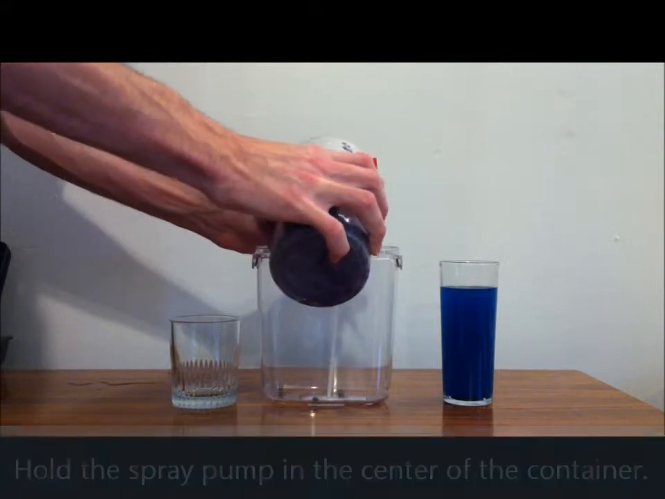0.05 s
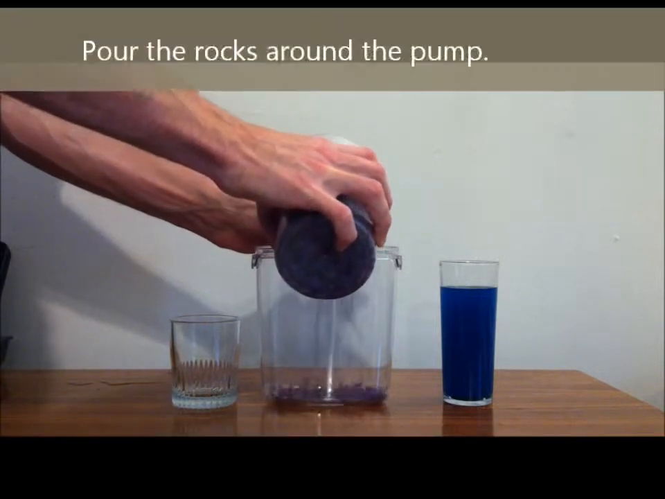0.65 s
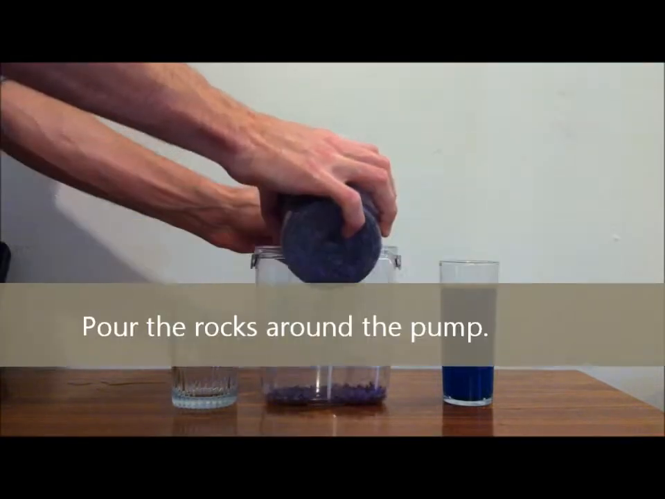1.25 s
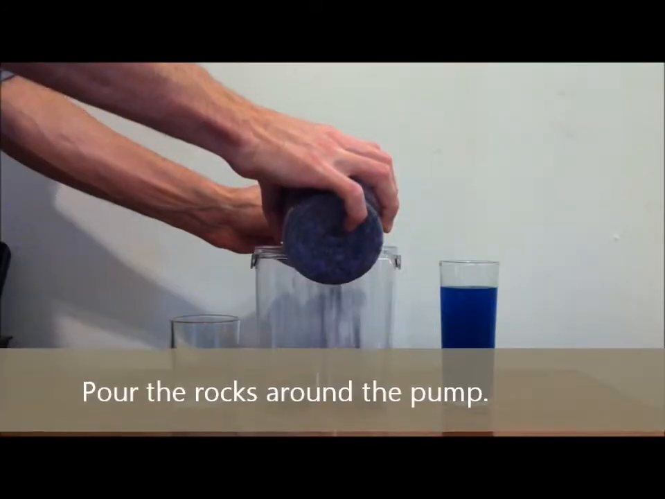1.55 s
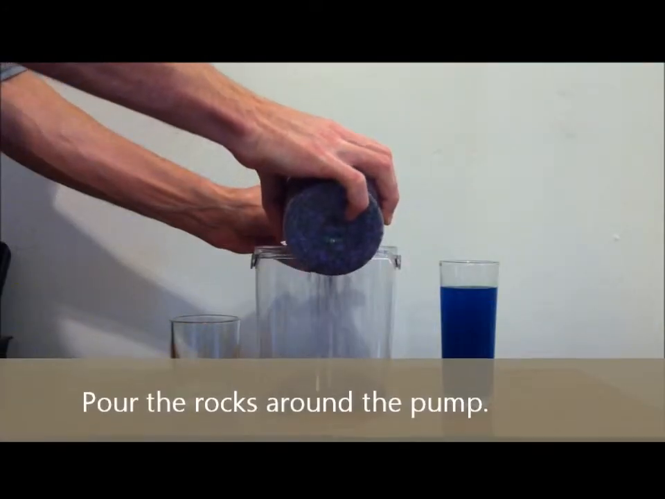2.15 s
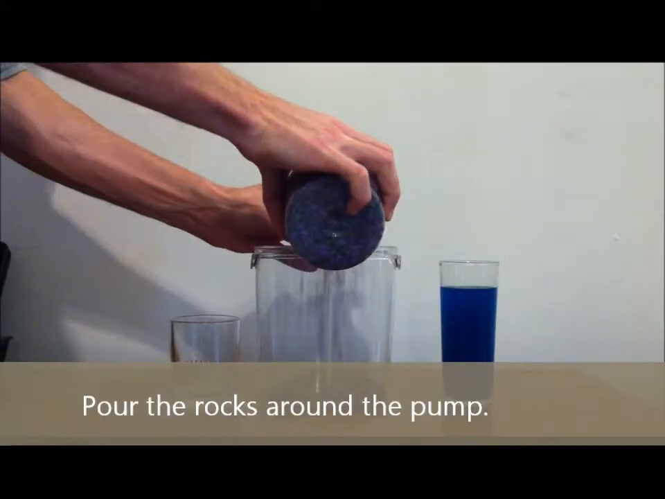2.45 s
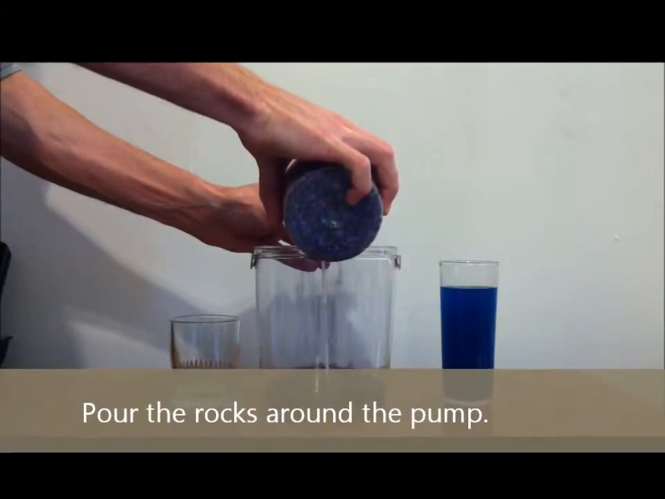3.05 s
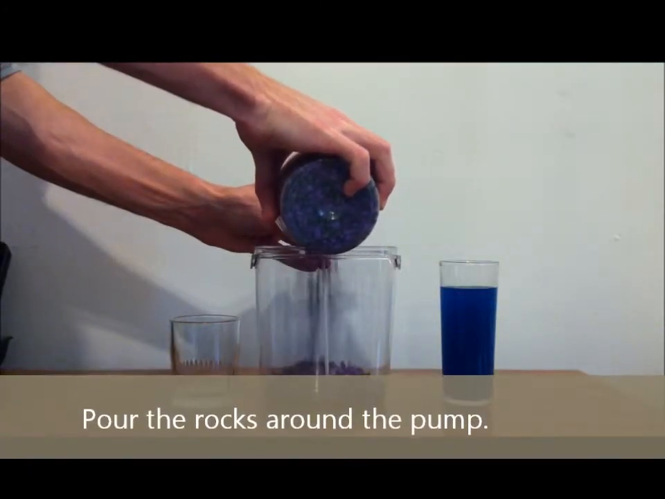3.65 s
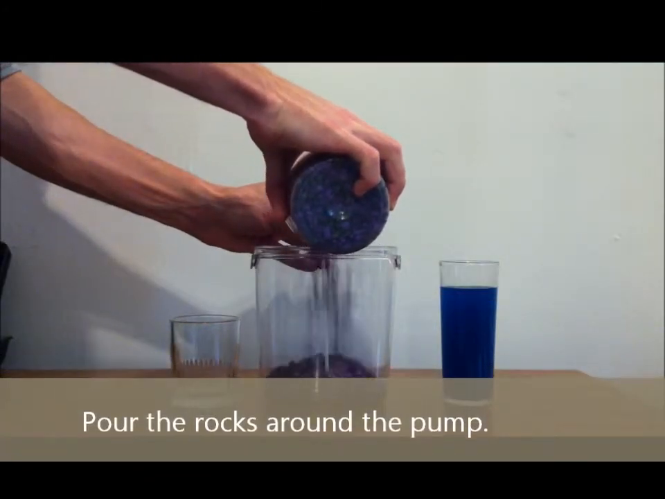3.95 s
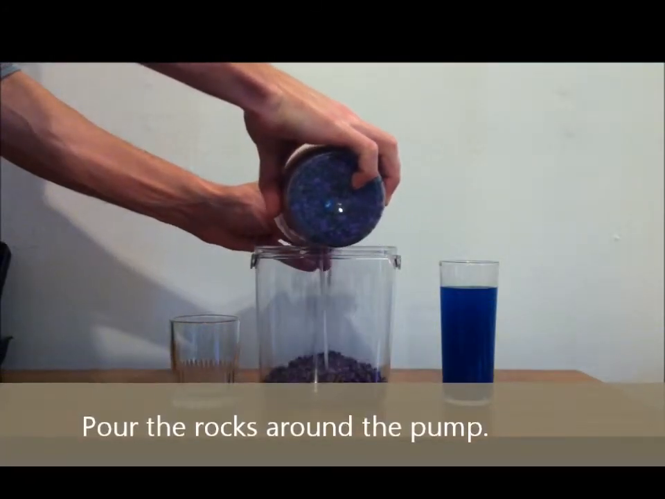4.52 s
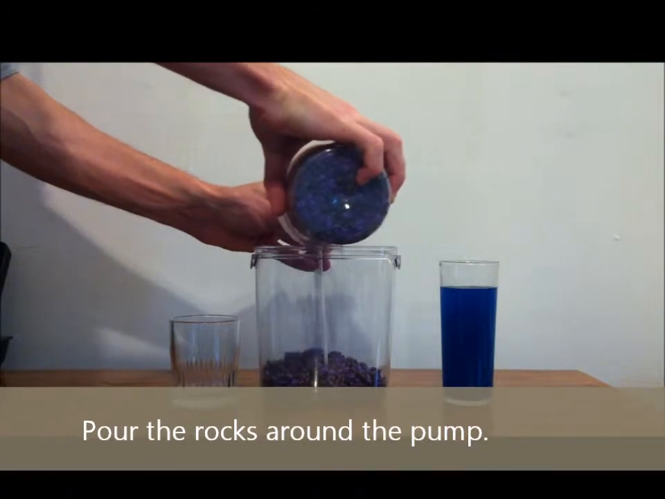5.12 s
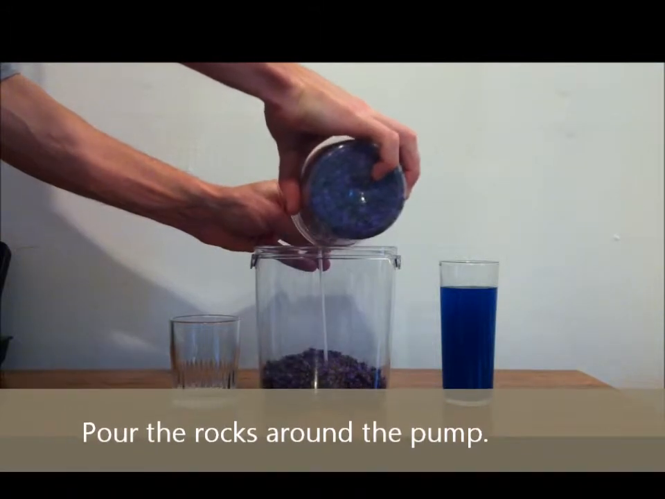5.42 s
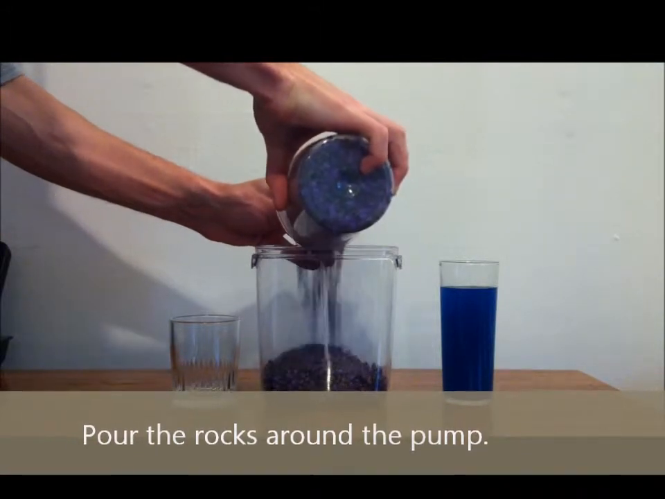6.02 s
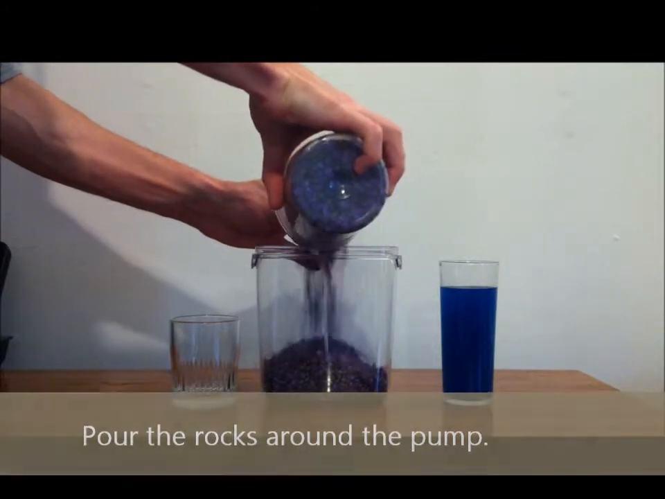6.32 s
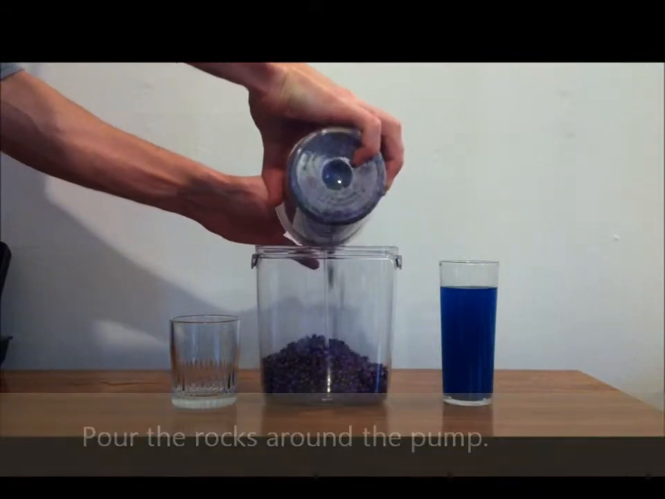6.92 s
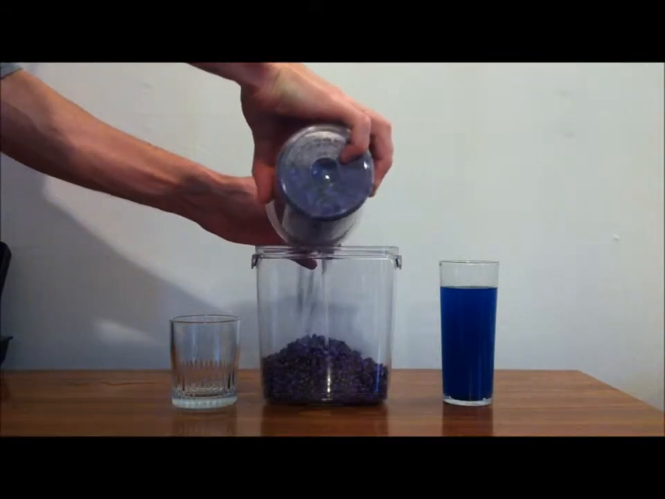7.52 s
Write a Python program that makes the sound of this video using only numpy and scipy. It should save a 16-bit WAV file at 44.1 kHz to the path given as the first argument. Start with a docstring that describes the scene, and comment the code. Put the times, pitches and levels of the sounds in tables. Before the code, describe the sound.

Small gravel pours from a tub into a tall plastic container in a small, bare room. A few stones click down sharply at the start. From about 0.4 seconds a loud, dense rattle bounces on the bare plastic bottom and makes it ring. Between 1 and 2.3 seconds the growing heap muffles this into quieter stone-on-stone pattering, over faint hollow tones and the rustle of gravel sliding in the tub. Stray stones ping off the walls. The stream swells around 3.8 seconds, then runs unevenly, thinning after 5.2 and almost stopping at 5.6, leaving a faint rustle. It resumes from about 6 to 6.6 seconds with a few light, hollow knocks. After that, the last stones trickle down in small clicking clumps, with occasional soft knocks, until about 7.8 seconds.

```python
"""A stream of small gravel pours from a tub into a tall plastic container on a table in a small, bare room.
Each stone clicks as it lands. The first ones bounce and ring the bare plastic base; the growing heap
muffles it and lowers its pitch, leaving stone-on-stone clicks over the hollow notes of tub and container.
Gravel rustles in the tub, and stray stones ping and knock on the walls. The stream falters as it jams
at the lip, and the last stones drop in small clumps."""
import sys
import numpy as np
from scipy import signal
from scipy.io import wavfile
from scipy.ndimage import uniform_filter1d

SR = 44100
rng = np.random.default_rng(int(sys.argv[2]) if len(sys.argv) > 2 else 0)


def dump(signal):
    """Clip the signal to [-1, 1] and save it as 16-bit WAV at the path in sys.argv[1]."""
    limited = np.clip(np.atleast_2d(signal).T, -1, 1)
    pcm = np.round(limited * 32767).astype(np.int16)
    wavfile.write(sys.argv[1], SR, pcm)


N = 343098
TIME = np.arange(N) / SR

# The pour as the tub is tipped and righted. Each row: time in seconds, stone-on-stone level in dB.
POUR_LEVEL = [(0, -52), (0.38, -49.5), (0.41, -40.5), (0.87, -39), (1.0, -42), (1.3, -42.5), (1.85, -39.5),
              (2.12, -39), (2.23, -44), (3.5, -41.5), (3.8, -36), (4.12, -37.5), (4.24, -44), (4.64, -48),
              (4.8, -43), (5.2, -44.5), (5.3, -51.5), (5.58, -53), (5.61, -73.5), (5.76, -72.5),
              (5.89, -59.5), (6.03, -44.5), (6.52, -40.5), (6.64, -52.5), (7.15, -57), (7.78, -55.5)]
# The plastic base before the heap loads it. Each row: mode frequency in Hz, width in Hz, level in dB.
BASE_MODES = [(1160, 65, -2), (1277, 18, 7), (1322, 35, 5), (1373, 33, 9), (1423, 61, 4.5), (1757, 23, 6.5),
              (2210, 90, 0), (2413, 35, 5.5), (2540, 27, 4.5), (2950, 28, -2), (3190, 40, 2.5),
              (3337, 22, 10), (3850, 37, 2.5), (5280, 130, 3)]
# The container's walls. Each row: mode frequency in Hz, width in Hz, level in dB.
WALL_MODES = [(464, 24, -2), (568, 22, 5.5), (637, 31.3, -0.5), (694, 15, -4), (737, 24, -3), (949, 42, -6),
              (1042, 61, -7.5)]

USUAL_POUR_DB = -40
LOADING_S = (1.6, 3.8)  # over this span the heap flattens the base's pitch and damps the wall pings


def gain_of(db):
    """Decibels to amplitude."""
    return 10 ** (np.asarray(db) / 20)


def unit_energy(x):
    """Scales a response to an energy of one."""
    return x / np.linalg.norm(x)


def at_frequency(rows, hz):
    """Reads a spectrum table on a log-frequency axis."""
    row_hz, values = np.transpose(rows)
    return np.interp(np.log(hz + 1), np.log(row_hz + 1), values)


def at_time(rows, s):
    """Reads a time table at s seconds."""
    return np.interp(s, *np.transpose(rows))


def add(mix, s, sound):
    """Mixes a sound in at s seconds."""
    part = mix[max(round(s * SR), 0):][:len(sound)]
    part += sound[:len(part)]


def through(x, response):
    """Plays x through an impulse response."""
    return signal.oaconvolve(x, response)[:len(x)]


def smoothed(x, over_s, passes=1):
    """A moving average, applied once or more."""
    for _ in range(passes):
        x = uniform_filter1d(x, int(over_s * SR) + 1)
    return x


def steadied(x, over_s, passes=2, floor=1e-9):
    """Holds the mean power near one, leaving quicker flicker as it is."""
    return x / np.sqrt(abs(smoothed(x ** 2, over_s, passes)) + floor)


def sharpest_response(spectrum, size=1024):
    """The minimum-phase impulse response with the given colour."""
    hz = abs(np.fft.fftfreq(size, 1 / SR))
    log_gain = np.log(gain_of(at_frequency(spectrum, hz)))
    response = np.fft.ifft(np.exp(np.conj(signal.hilbert(log_gain)))).real
    return unit_energy(response[:size // 2])


def ringing(modes, size=4096):
    """A struck body's decaying modes; the sign of each depends on where the blow lands."""
    t = np.arange(size) / SR
    ring = np.zeros(size)
    for hz, width_hz, db in modes:
        envelope = gain_of(db) * width_hz * np.exp(-np.pi * width_hz * t)
        ring += rng.choice([-1, 1]) * envelope * np.cos(2 * np.pi * hz * t)
    return unit_energy(ring)


def sustained_ring(blows, modes, rooms, steady_s, places=4):
    """A body kept ringing at an even level by blows that land in a few places."""
    place = rng.integers(0, places, N)
    rings = (through(blows * (place == k), signal.fftconvolve(ringing(modes), space))
             for k, space in enumerate(rooms[:places]))
    return steadied(sum(rings), steady_s)


def hush(level_db=-82):
    """The microphone's own faint, steady noise."""
    # A dark noise colour. Each row: frequency in Hz, relative density in dB.
    colour = [(25, 11), (65, -4), (140, 5.5), (500, -3), (1200, -3), (5000, -21), (16000, -42)]
    return gain_of(level_db) * through(rng.standard_normal(N), sharpest_response(colour, size=4096))


def room(tail_db=2.0, build_s=0.0023, wander_s=.0004, size=17640):
    """Direct sound, a few hard reflections, then a dense tail whose bands die at their own speeds."""
    # The room's decay. Each row: frequency in Hz, seconds to fall by 60 dB.
    decay_times = [(150, 0.38), (600, 0.14), (2000, 0.3), (6000, 0.44), (12000, 0.27), (16000, 0.21)]
    # Early reflections from table and walls. Each row: delay in seconds, level in dB.
    reflections = [(.0013, -11.5), (.0064, -7), (.0075, -19), (0.0115, -8), (0.013, -11), (0.0144, -9.5)]
    hz, t, bands = signal.stft(rng.standard_normal(size), SR, nperseg=256)
    decay = gain_of(-60 * t / at_frequency(decay_times, hz)[:, None])
    tail = signal.istft(bands * decay, SR, nperseg=256)[1][:size]
    fade_in = 1 - np.exp(-(np.arange(size) / SR / build_s) ** 2)
    response = gain_of(tail_db) * unit_energy(tail * fade_in)
    response[0] += 1
    for delay_s, db in reflections:
        shift_s = wander_s * (2 * rng.random() - 1)  # paths shift with the landing place
        add(response, delay_s + shift_s, [gain_of(db)])
    return response


def lumps_db(swing_db, lump_s):
    """Gravel leaves the tub in lumps: a slow random swing in level."""
    lumps = smoothed(rng.standard_normal(N), lump_s, passes=2)
    return swing_db * lumps / lumps.std()


def jams_db(depth_db=-12):
    """The level dips as gravel jams at the lip of the tub, and snaps back as it gives way."""
    # Each row: moment of release in seconds, choking time in seconds.
    jams = [(.07, 0.047), (.192, 0.014), (1.145, 0.034), (3.375, 0.056), (4.425, .012), (4.53, 0.023),
            (5.345, 0.048), (6.943, 0.034), (7.13, 0.025), (7.26, 0.02), (7.362, .015), (7.55, .012),
            (7.72, 0.0054)]
    return depth_db * sum((TIME < s) * np.exp(-((s - TIME) / choke_s) ** 2) for s, choke_s in jams)


def bare_share(s, cover_from_s=.85, covered_s=2.3):
    """Share of the plastic base that the heap has not yet covered."""
    return np.interp(s, [cover_from_s, covered_s], [1, 0])


def base_ring_db(s, bare_db=-15, covered_db=-22, scatter_db_per_db=0.13):
    """The base's ring against the click: muffled by the heap, though a strong pour scatters stones on it."""
    under_heap_db = covered_db + scatter_db_per_db * (at_time(POUR_LEVEL, s) - USUAL_POUR_DB)
    return under_heap_db + bare_share(s) ** 2 * (bare_db - under_heap_db)


def base_pitch(s, sag=.036):
    """Pitch of the base under the heap's weight, as a share of its unloaded pitch."""
    return 1 - sag * np.interp(s, LOADING_S, [0, 1])


def body_gains():
    """How strongly the table, the tub and the container's walls sound over time."""
    # Each row: time in seconds, then the levels of table, tub and walls in dB.
    body_levels = [(0.0, -75, -66, -79), (0.13, -90, -80, -85), (0.2, -71, -66, -67), (0.26, -80, -74, -73),
                   (0.45, -69.5, -65, -63), (1.02, -72, -66, -59), (1.25, -70, -83, -66),
                   (1.45, -70, -66, -63), (2.1, -69.5, -62, -58), (2.14, -71.5, -68.5, -60.5),
                   (3.51, -71, -65.5, -62), (3.79, -70, -58, -54), (4.12, -67.5, -69, -57),
                   (4.27, -72, -72, -68), (4.44, -78, -71, -60), (4.48, -75, -65, -66),
                   (5.29, -70.5, -66, -68.5), (5.329, -80, -75, -76), (5.36, -71, -63, -61.5),
                   (5.62, -90, -83, -92), (5.87, -77, -73, -80), (5.93, -75, -62, -68),
                   (6.03, -76, -67, -66), (6.08, -68, -60, -66), (6.22, -70, -63, -69),
                   (6.44, -70, -60.5, -62), (6.72, -72, -70.5, -73), (6.93, -79, -70, -75),
                   (6.99, -80, -71, -67), (7.09, -75, -71, -70.5), (7.39, -80, -74.5, -74.5),
                   (7.52, -72, -67, -76), (7.7, -73, -66, -73.5), (7.78, -77, -69, -79)]
    s, *levels = np.transpose(body_levels)
    return [gain_of(np.interp(TIME, s, db)) for db in levels]


def knocks(rooms, size=8192):
    """A stone or the tub taps the plastic walls or rim, giving one short note."""
    # Each row: start in seconds, pitch in Hz, level in dB, seconds to fall by 60 dB.
    taps = [(1.36, 2950, -32, 0.1), (1.68, 3304, -34, 0.12), (2.335, 3040, -41, 0.098),
            (2.72, 3030, -46, 0.07), (2.79, 3050, -45, .08), (2.843, 3083, -44, 0.065),
            (3.235, 3050, -42, 0.07), (3.73, 1390, -43, 0.071), (3.79, 1380, -41, 0.11),
            (4.372, 499.6, -43.5, 0.08), (6.067, 510, -47.5, .12), (6.125, 776, -47, .09),
            (6.26, 515, -47, .14), (6.41, 789, -44, 0.12), (6.55, 507, -47, .1), (6.805, 496, -48, 0.13),
            (7.063, 643, -42, 0.016), (7.42, 1120, -47, 0.014), (7.51, 506, -51.5, 0.16)]
    out, t = np.zeros(N), np.arange(size) / SR
    for k, (s, hz, db, t60) in enumerate(taps):
        note = gain_of(db - 60 * t / t60) * np.sin(2 * np.pi * hz * t)
        add(out, s, signal.fftconvolve(note, unit_energy(rooms[k % len(rooms)])))
    return out


def ricochets(rooms, per_s=22, over_pour_db=11, filled_db=-8, spread_db=3.0, detune=0.023):
    """Stones jump off the heap and ping the wall; each spot rings its own way, softer as the heap rises."""
    # The upper walls. Each row: mode frequency in Hz, width in Hz, level in dB.
    ping_modes = [(1710, 37, -5), (3040, 28, -2), (4100, 53, -2), (4940, 69, -12)]
    damping_db = np.interp(TIME, LOADING_S, [0, filled_db])
    variation_db = spread_db * np.clip(rng.standard_normal(N), -2, 2)
    force_db = at_time(POUR_LEVEL, TIME) + over_pour_db + damping_db + variation_db
    force = (rng.random(N) < per_s / SR) * gain_of(force_db)
    place, out = rng.integers(0, len(rooms), N), np.zeros(N)
    for k, space in enumerate(rooms):
        spot = [(hz * (1 + detune * rng.standard_normal()), width, db + spread_db * rng.standard_normal())
                for hz, width, db in ping_modes]
        out += through(force * (place == k), unit_energy(signal.fftconvolve(ringing(spot), space)))
    return out


def tub(rooms, hollow_db=1.0, rustle_db=5.5, grains_per_s=5000):
    """Gravel sliding in the tub rustles dully and keeps its hollow note sounding; at times it slumps."""
    # The colour of sliding gravel. Each row: frequency in Hz, relative density in dB.
    rustle_colour = [(200, -42), (800, -8), (1300, -6.5), (2300, -2.5), (4300, 0), (7000, -5.5),
                     (12000, -9.5), (16000, -5)]
    # Gravel shifts without falling. Each row: peak time in seconds, level in dB, rise and fall in seconds.
    slumps = [(5.526, -45.5, .001, 0.014), (5.80, -55.5, 0.047, 0.28), (7.135, -59, .002, 0.077),
              (7.45, -61, 0.024, 0.11)]
    hollow_mode = [(501, 16, 0)]  # frequency in Hz, width in Hz, level in dB
    _, sliding, _ = body_gains()
    grains = steadied((rng.random(N) < grains_per_s / SR) * rng.standard_normal(N), over_s=.02)
    slumping = sum(gain_of(db) * np.exp(-abs(TIME - s) / np.where(TIME < s, rise_s, fall_s))
                   for s, db, rise_s, fall_s in slumps)
    grain_response = unit_energy(signal.fftconvolve(sharpest_response(rustle_colour), rooms[-1]))
    rustle = through(grains * (gain_of(rustle_db) * sliding + slumping), grain_response)
    surges = gain_of(lumps_db(swing_db=2.0, lump_s=0.037))
    hollow = sustained_ring(grains * surges, hollow_mode, rooms, steady_s=0.34)
    return rustle * gain_of(jams_db()) + gain_of(hollow_db) * sliding * hollow


def container(blows, rooms, table_db=-1.0, walls_db=1.0):
    """The falling stones shake the walls, the air above the heap and the table beneath."""
    # The table's low ring. Each row: mode frequency in Hz, width in Hz, level in dB.
    table_modes = [(141.2, 10, 3), (191, 23, -2), (217, 34, -4), (273, 29, -0.5), (368, 17, 2.5)]
    # The air column against the walls as the container fills. Each row: time in seconds, level in dB.
    column_balance = [(0, -8), (4.5, -2.5), (6.1, 2.5), (7.5, -3)]
    column_mode = [(778, 76, 0)]  # frequency in Hz, width in Hz, level in dB
    table_gain, _, wall_gain = body_gains()
    table = gain_of(table_db) * sustained_ring(blows, table_modes, rooms, steady_s=0.25)
    walls = gain_of(walls_db) * sustained_ring(blows, WALL_MODES, rooms, steady_s=0.28)
    column = sustained_ring(blows, column_mode, rooms, steady_s=0.2)
    column *= gain_of(at_time(column_balance, TIME))
    surges = gain_of(lumps_db(swing_db=2.0, lump_s=0.031))
    return table_gain * table + wall_gain * (walls + column) * surges


def stone_clicks(chatter_s=0.00044, chatter_db=-9, soft_tilt=0.0, hard_tilt=0.47, count=96, size=256):
    """Clicks from soft to hard: a harder blow is a shorter, brighter contact (tilts in dB per octave)."""
    # The colour of a stone's click. Each row: frequency in Hz, relative density in dB.
    click_colour = [(100, -49), (400, -25), (800, -18.5), (1100, -12), (1700, -10), (3000, -7.5),
                    (4600, -7.5), (6500, -7), (7700, -6), (9300, -2.5), (11800, 0.5), (13000, -0.5),
                    (14200, -4.5), (15800, -7.5)]
    t = np.arange(size) / SR
    contacts = gain_of(chatter_db) * rng.standard_normal((count, size)) * np.exp(-t / chatter_s)
    contacts[:, 0] = 1  # the hit itself, ahead of each stone's own chatter
    colours = [sharpest_response([(hz, db + tilt * np.log2(hz)) for hz, db in click_colour])
               for tilt in np.linspace(soft_tilt, hard_tilt, count)]
    return np.array([unit_energy(through(contact, colour)) for contact, colour in zip(contacts, colours)])


def rocking_stone(contacts_per_s=4000, decay_s=0.002, size=480):
    """A large stone lands on an edge and rocks to rest: a few contacts within milliseconds."""
    contacts = (rng.random(size) < contacts_per_s / SR) * rng.choice([-1., 1.], size)
    contacts[0] = 1
    return unit_energy(contacts * np.exp(-np.arange(size) / SR / decay_s))


def clumps(rooms, follow_per_s=800, spread_db=3.0, base_db=4.5, walls_db=-30, lead_ring_db=-5, size=12288):
    """A clump breaks loose: a large stone cracks down, then smaller ones scatter and quickly settle."""
    # Each row: start in seconds, lead stone's level in dB, followers' level in dB,
    # settling time in seconds, brightness in dB per octave.
    drops = [(.002, -7, -31, .008, 0.5), (.0718, -10, -37, .02, 0), (.086, -7.5, -32.5, .04, 0),
             (.1932, 1, -32, .028, -0.7), (.2663, -6.5, -27, 0.027, 0.3), (.3535, -15, -43, .01, 0),
             (.3939, 1, -25, 0.037, -0.5), (.4967, 0, -24.5, 0.12, 1), (.6343, -1, -39, .024, -1.5),
             (.685, -10, -19, 0.037, 0), (.8152, 1, -42, .022, -1), (.925, -2, -23.5, .034, 1.5),
             (1.06, -10, -23.5, 0.037, 1), (1.16, -11, -30.5, 0.1, 0.5), (1.3595, -9.5, -31.5, 0.11, -1.8),
             (1.53, -16, -27, 0.018, -2), (1.95, -22, -36, 0.029, 4), (2.07, -17, -42, .04, -2),
             (2.29, -27, -40, 0.037, 0.5), (2.372, -20, -34.5, 0.034, -1.5), (2.41, -21, -47, .012, .3),
             (2.57, -31, -41, 0.069, -0.7), (2.6358, -22, -39.5, 0.04, 0), (2.72, -17, -46, .02, .5),
             (2.8439, -17, -55, .022, -1.3), (2.936, -14.5, -42, .015, 2), (3.075, -23, -42, 0.019, 1),
             (3.0859, -12, -49, .041, -1.2), (3.14, -26, -38.5, 0.17, 0.2), (3.37, -19, -48, .02, -1),
             (3.395, -14.5, -42, .019, 2), (3.639, -29, -52, .035, .8), (3.72, -18, -35.5, .09, 1),
             (3.95, -23, -40, 0.031, 5), (4.11, -16, -41, .04, 5), (4.2925, -27, -46.5, 0.12, 0),
             (4.4285, -12.5, -44, .028, -1), (4.5306, -20, -42.5, 0.024, -0.5),
             (4.694, -24, -39.5, 0.024, -0.7), (4.775, -27, -42, 0.038, -1), (4.9536, -27, -48, .016, .8),
             (4.9857, -14.5, -37, .04, 3), (5.026, -11, -48, .026, 3.5), (5.121, -18, -52, .02, 1),
             (5.3455, -22, -46.5, 0.038, 1), (5.356, -20, -42.5, 0.037, 0.5), (5.48, -26, -52, .05, 6),
             (5.7918, -28.5, -54, .025, 1), (5.952, -27, -44, .08, .8), (6.067, -17.5, -44, 0.058, -2.5),
             (6.16, -20, -37, .037, 1), (6.3707, -22, -36.5, .07, 2.5), (6.684, -25, -48, .035, 0.5),
             (6.749, -24, -57, .017, .8), (6.785, -29, -54, 0.017, -2), (6.8216, -25, -55, .022, -0.3),
             (6.944, -38, -52, .03, 3), (6.9612, -21, -53, .02, 3), (6.9678, -20, -39.5, .03, 1.5),
             (7.0637, -20, -54, .013, -0.5), (7.131, -27, -51, .03, 3), (7.188, -22, -54, .02, .3),
             (7.2614, -20, -59, .016, 1), (7.293, -23, -53, 0.021, 0), (7.3622, -24.5, -52, .022, -0.3),
             (7.5505, -21.5, -52, .025, 2), (7.603, -29, -50, 0.043, -1), (7.7214, -18.5, -44.5, .09, 2)]
    places, t = np.zeros((len(rooms), N)), np.arange(size) / SR
    for k, (s, lead_db, follow_db, settle_s, tilt) in enumerate(drops):
        stones = stone_clicks(chatter_db=-13, soft_tilt=tilt, hard_tilt=tilt, count=4)
        struck = rng.random(size) < follow_per_s / SR
        followers = struck * gain_of(spread_db * rng.standard_normal(size)) * rng.choice([-1, 1], size)
        followers = steadied(followers, over_s=0.017, passes=1, floor=1e-6)
        followers *= gain_of(follow_db) * np.exp(-t / settle_s) / np.linalg.norm(rooms[0])
        lead = gain_of(lead_db) * rocking_stone()
        lead = np.pad(lead, (0, size - len(lead)))
        loaded_modes = [(hz * base_pitch(s), width, db) for hz, width, db in BASE_MODES]
        plastic = gain_of(base_db + base_ring_db(s)) * ringing(loaded_modes)
        plastic += gain_of(walls_db) * ringing(WALL_MODES)
        add(places[k % len(rooms)], s, through(followers + gain_of(lead_ring_db) * lead, plastic))
        blows = followers + lead
        stone, place = rng.integers(0, len(stones), size), rng.integers(0, len(rooms), size)
        for hit in np.flatnonzero(blows):
            add(places[place[hit]], s + t[hit], blows[hit] * stones[stone[hit]])
    return sum(through(x, space) for x, space in zip(places, rooms))


def impacts(usual_per_s=950, tenfold_db=29.5, bare_bounces=.9, spread_db=4.0, bunch_db=3.5):
    """Random blows, many light and a few heavy; a stronger pour and bounces on bare plastic bring more."""
    per_s = usual_per_s * 10 ** ((at_time(POUR_LEVEL, TIME) - USUAL_POUR_DB) / tenfold_db)
    per_s *= 1 + bare_bounces * bare_share(TIME)
    struck = rng.random(N) < per_s / SR
    bunches = smoothed(rng.standard_normal(N), over_s=0.0087)  # heavy blows come in bunches
    force_db = spread_db * np.minimum(rng.exponential(1, N), 3.5) + bunch_db * bunches / bunches.std()
    blows = struck * gain_of(force_db) * rng.choice([-1, 1], N)
    return steadied(blows, over_s=.045, passes=1, floor=1e-6)


def gravel_stream(blows, stones, rooms, clicks_db=-0.05, bare_boost_db=16):
    """Each blow clicks one stone and rings the base: loud on bare plastic, muffled on the heap."""
    pour_db = at_time(POUR_LEVEL, TIME) + lumps_db(swing_db=1.37, lump_s=0.034)
    force = blows * gain_of(pour_db + bare_boost_db * bare_share(TIME) + jams_db())
    base_force = force * gain_of(base_ring_db(TIME))
    base_clock = np.cumsum(base_pitch(TIME))  # a loaded base swings more slowly
    ranked = np.sort(abs(blows[blows != 0]))
    place, out = rng.integers(0, len(rooms), N), np.zeros(N)
    for k, space in enumerate(rooms):  # every landing place has its own paths through the room
        hits = np.flatnonzero(blows * (place == k))
        hardness = np.searchsorted(ranked, abs(blows[hits])) * len(stones) // len(ranked)
        click_samples = hits[:, None] + np.arange(stones.shape[1])
        clicks = np.bincount(click_samples.ravel(), (force[hits, None] * stones[hardness]).ravel(), N)[:N]
        base_hits = np.bincount(base_clock[hits].astype(int), base_force[hits], N)[:N]
        unloaded_ring = through(base_hits, ringing(BASE_MODES))
        ring = np.interp(base_clock, np.arange(N), unloaded_ring)
        out += through(gain_of(clicks_db) * clicks + ring, unit_energy(space))
    return out


def scene(landing_places=8):
    """Stream, container, tub, clumps, ricochets and knocks share one room, the same in both channels."""
    stones = stone_clicks()
    rooms = [room() for _ in range(landing_places)]
    blows = impacts()
    mono = gravel_stream(blows, stones, rooms) + container(blows, rooms) + tub(rooms)
    mono += clumps(rooms) + ricochets(rooms) + knocks(rooms)
    return np.array([mono, mono])


def record(dry, low_cut_hz=120, high_cut_hz=15800):
    """Rolls off the bass, adds the hush and trims the highest treble."""
    low_cut = signal.butter(4, low_cut_hz, "highpass", fs=SR, output="sos")
    high_cut = signal.firwin(511, high_cut_hz, window=("kaiser", 9), fs=SR)
    return signal.oaconvolve(signal.sosfilt(low_cut, dry) + hush(), high_cut[None], "same")


dry = scene()
out = record(dry)
dump(out)
```